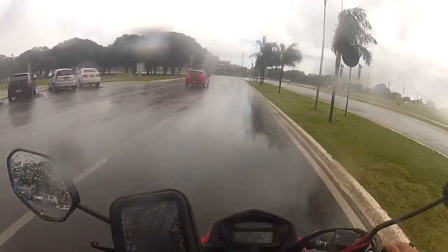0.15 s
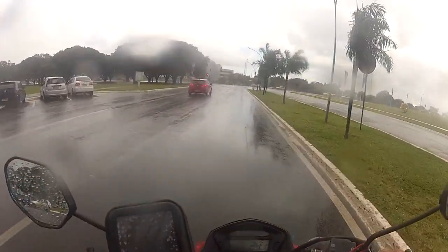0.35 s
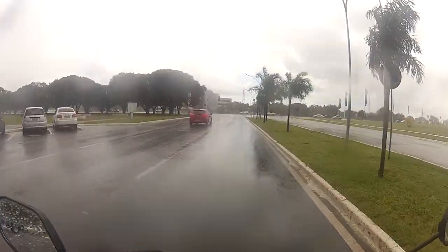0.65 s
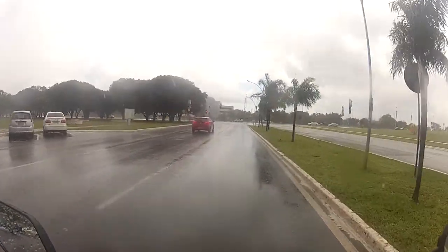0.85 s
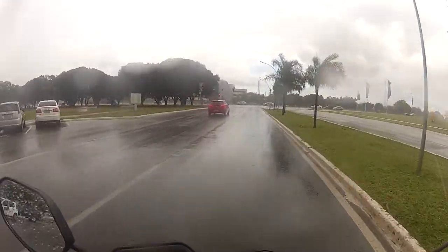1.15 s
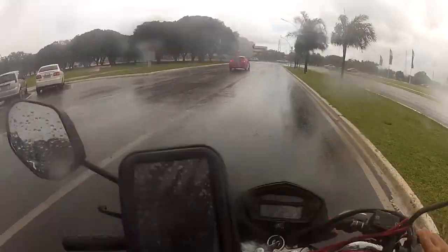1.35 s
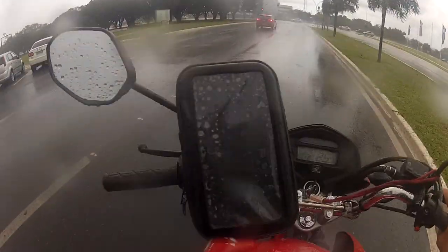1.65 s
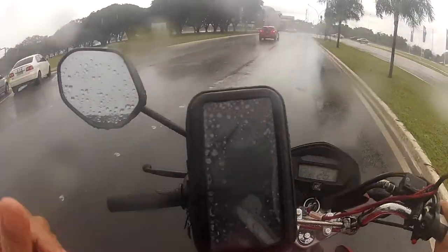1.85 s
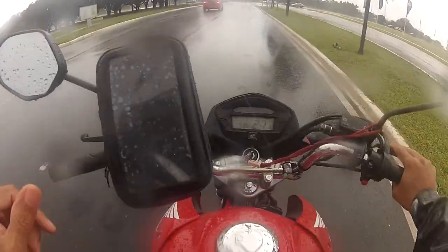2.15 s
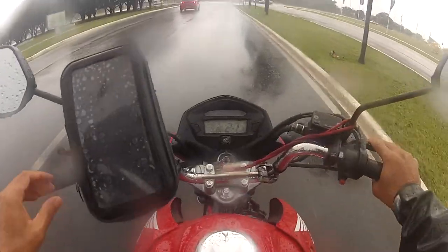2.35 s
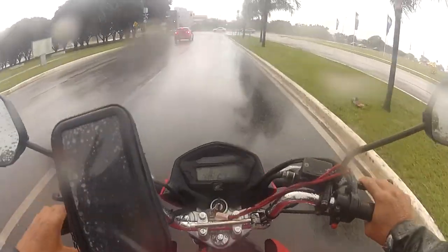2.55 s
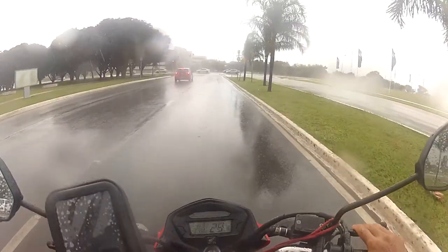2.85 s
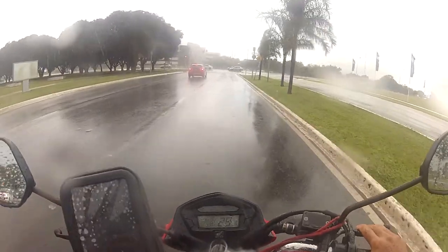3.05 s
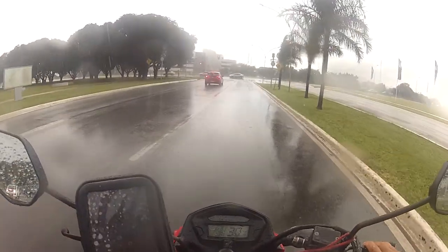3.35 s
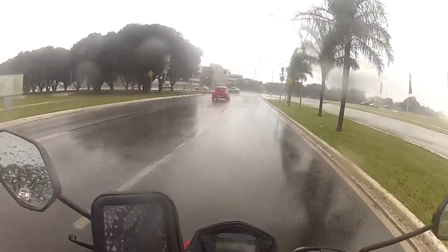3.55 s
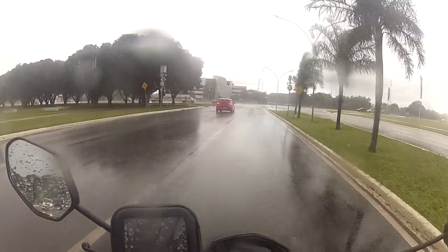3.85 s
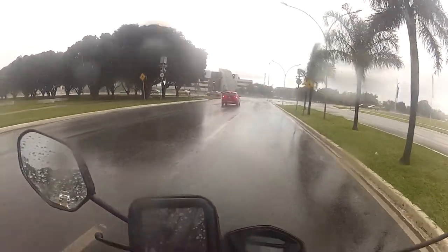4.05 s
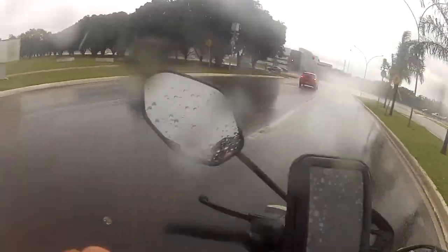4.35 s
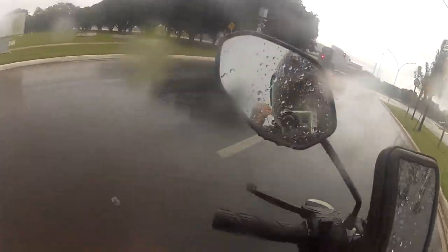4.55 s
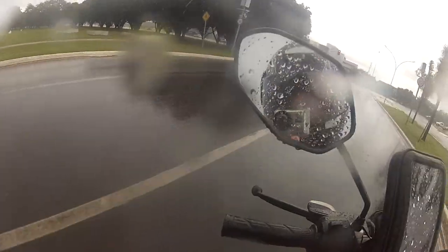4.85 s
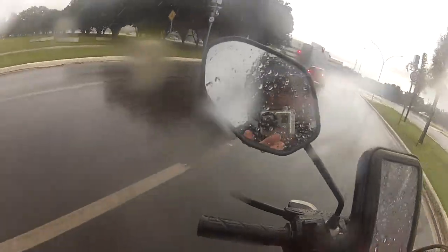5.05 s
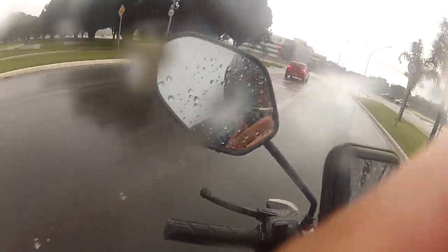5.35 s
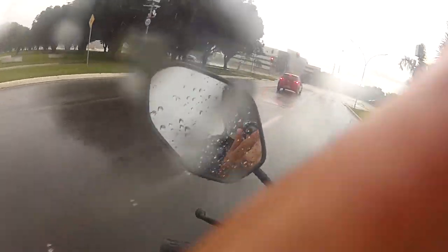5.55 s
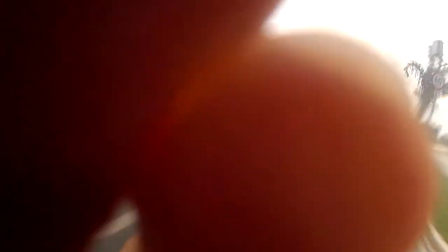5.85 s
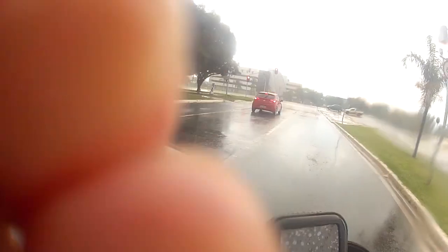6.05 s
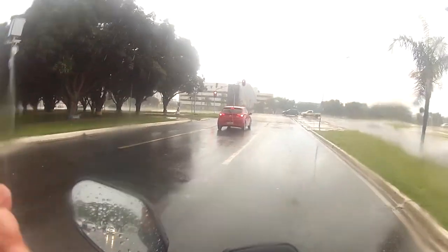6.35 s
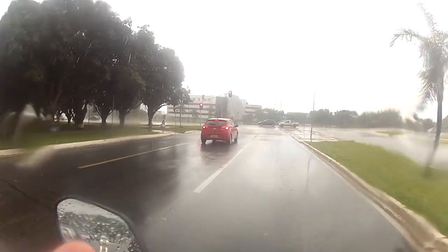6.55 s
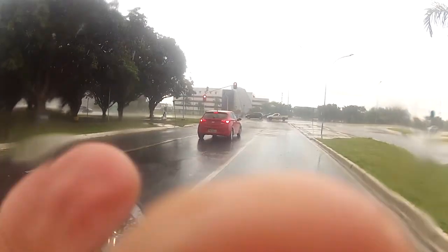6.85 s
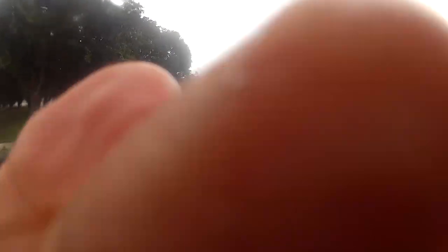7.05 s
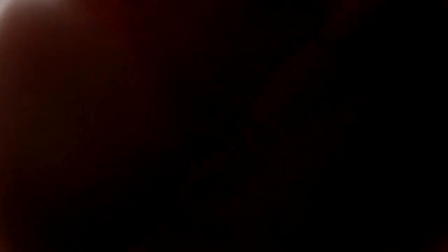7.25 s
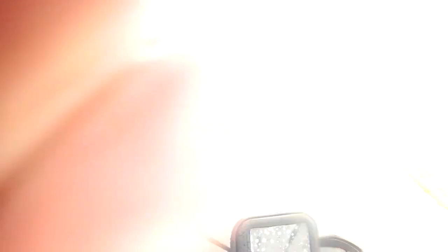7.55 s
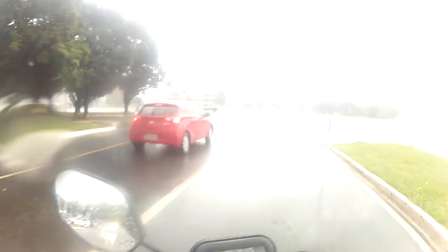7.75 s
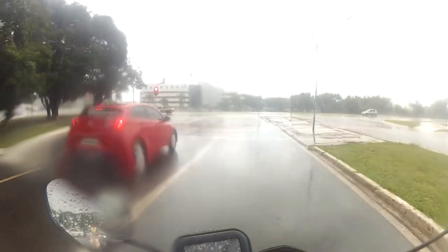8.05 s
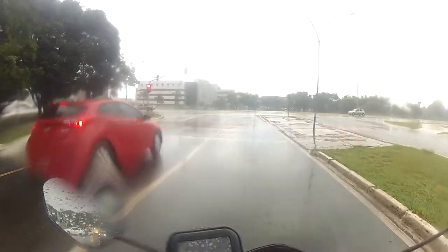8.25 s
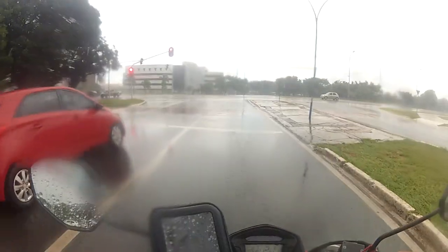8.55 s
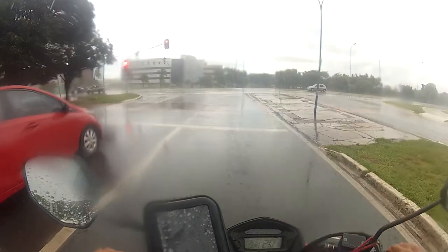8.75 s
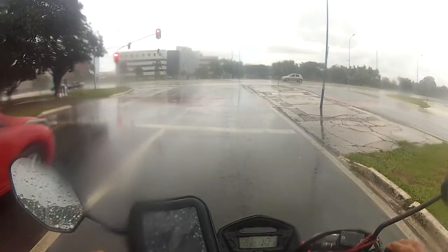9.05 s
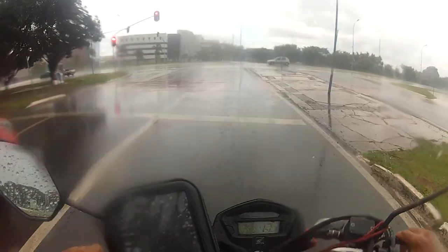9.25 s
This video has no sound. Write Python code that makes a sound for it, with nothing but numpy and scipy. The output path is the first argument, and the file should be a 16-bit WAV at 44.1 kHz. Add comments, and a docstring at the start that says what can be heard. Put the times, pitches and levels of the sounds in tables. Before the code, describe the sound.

Heard from inside a waterproof plastic case on a slowly rolling motorcycle: irregular sharp raindrop cracks, some with deep thuds, over faint wet-tyre hiss, low wind rumble and a barely audible engine. Around six seconds a wet finger rasps on the cover, judders again after seven, and a thin brake squeal comes near nine.

```python
"""Heavy rain taps on a waterproof plastic case with a camera inside, on a slowly rolling motorcycle.
Each drop is a crack of noise plus decaying sines, and the squarest hits add a low, damped sine thud.
Filtered noise makes patter, tyre wash, wind and gusts; the engine is a low tone with dull puffs.
Later a wet finger judders across the lens cover as stick-slip clicks and a filtered sawtooth.
Near the end a brake squeals as gliding sines; gain control and a slow converter colour it all."""
import sys
import numpy as np
from scipy import signal
from scipy.fft import rfft, irfft, next_fast_len
from scipy.io import wavfile
from scipy.ndimage import uniform_filter1d

SR = 44100
rng = np.random.default_rng(int(sys.argv[2]) if len(sys.argv) > 2 else 0)


def pcm_store(signal):
    """Save signal as 16-bit PCM."""
    levels = np.round(np.clip(np.atleast_2d(signal), -1, 1) * 32767)
    wavfile.write(sys.argv[1], SR, levels.astype(np.int16).T)


N = 414099

# tyre wash and fine rain heard through the case: (frequency [Hz], relative density [dB per Hz])
WASH_SPECTRUM = [(300, -0.5), (500, -11), (850, -14.5), (1150, 0.5), (1500, -2.5), (1850, 7.5),
                 (2080, -3.5), (2350, 6.5), (2700, 0), (3300, -7), (3750, 2), (4200, -13.5), (5700, -8.5)]
# narrow resonances in the wash: (frequency [Hz], width [Hz], relative level [dB])
WASH_RESONANCES = [(646, 23, -19), (987, 72, -17.5), (1296, 170, -5)]
# swell of tyre wash and fine rain: (time [s], level before layer trims [dB])
WASH_LEVEL = [(0, -42), (0.9, -44.5), (2.0, -44.5), (3.6, -41), (4.4, -44.5), (5.2, -41), (6.45, -46),
              (7.3, -46), (8.45, -50.5), (8.85, -46), (9.39, -47.5)]
# rumble of wind on the case: (frequency [Hz], relative density [dB per Hz])
WIND_SPECTRUM = [(20, 13.5), (55, 3), (85, 8), (115, 3), (160, 6), (210, 1), (260, 1), (330, -17),
                 (450, -17), (900, -31)]
# swell of the wind: (time [s], level before trim [dB])
WIND_LEVEL = [(0, -36.5), (0.7, -50.5), (1.1, -51), (1.6, -53.5), (3.0, -56.5), (4.0, -47.5), (4.4, -53.5),
              (5.2, -49), (5.55, -53), (6.0, -46), (6.45, -59), (7.3, -41.5), (7.8, -53), (8.2, -56.5),
              (9.39, -60.5)]
# engine beat: (time [s], mean firings per second [Hz], level before trim [dB])
ENGINE_CURVE = [(0, 29, -46), (1.5, 22.8, -61), (3, 23.6, -43.5), (5.5, 21, -40.5), (7.5, 23, -59),
                (9.39, 19.6, -51)]
# gusts and bumps of the case: (time [s], level [dB], centre frequency [Hz])
CASE_BUFFETS = [(0.001, -22.5, 89.6), (.162, -30.5, 149), (0.27, -31, 161.5), (.335, -27, 122),
                (.38, -18, 105.5), (.49, -33.5, 94.3), (0.809, -25.5, 145.7), (0.865, -24, 168.3),
                (0.916, -33.5, 116.2), (1.076, -32.5, 85), (1.24, -36, 26.56), (3.368, -38.5, 63.1),
                (3.761, -40, 34.6), (3.94, -35.5, 120.3), (4.465, -41, 62.1), (4.872, -20.5, 90),
                (5.74, -18, 50), (5.794, -24.5, 217), (6.3, -44.5, 52.8), (6.72, -23, 54.73),
                (6.78, -35, 39.85), (8.96, -46.5, 189.5)]
# loudest drops on the case: (time [s], tap level [dB], wall knock level before trim [dB])
CASE_DROPS = [(0.0312, -19.5, -42), (0.194, -28.5, -51), (0.301, -16.5, -37), (0.3733, -7, -5),
              (0.5695, -34.5, -54.5), (0.652, -19.5, -35), (0.713, -34.5, -45), (0.7715, -23, -31.5),
              (0.801, -22, -17), (0.8393, -15.5, -33), (0.9891, -25, -49), (1.1323, -26.5, -60),
              (1.3612, -7.5, -17), (1.4067, -23, -46), (1.4423, -29.5, -53), (1.659, -35, -61),
              (1.6993, -29, -54), (1.7521, -23, -40), (1.7687, -27.5, -46), (2.317, -31.5, -37),
              (2.3311, -30.5, -54), (2.7833, -36.5, -71), (2.8722, -24.5, -37.5), (2.8814, -22, -65),
              (2.9315, -36, -64), (3.1214, -34.5, -51), (3.228, -25, -35), (3.2316, -16, -23),
              (3.3137, -26.5, -50), (3.5399, -22.5, -27.5), (3.6569, -32.5, -40.5), (3.8065, -26.5, -55),
              (3.8118, -24, -58), (3.8879, -25, -66), (3.9456, -30, -34), (4.0764, -32.5, -47),
              (4.208, -28, -56), (4.213, -21.5, -30), (4.3249, -26, -66), (4.4973, -32.5, -67),
              (4.7017, -33, -64), (4.7665, -26, -42), (4.8015, -31.5, -50), (4.834, -32, -63),
              (4.87, -12.5, -11), (4.9074, -31, -45), (5.0292, -34, -57), (5.1032, -23, -45),
              (5.228, -29.5, -45), (5.239, -23.5, -51), (5.319, -34, -46), (5.5447, -34, -62),
              (5.6963, -22.5, -58), (5.715, -21, -62), (5.7631, -24.5, -25.5), (5.8597, -18.5, -45),
              (5.9961, -27, -37.5), (6.042, -27.5, -35), (6.165, -24.5, -34), (6.1766, -13.5, -30),
              (6.431, -31, -61), (6.531, -31.5, -38.5), (6.65, -16, -35), (7.131, -26.5, -36.5),
              (7.5723, -29, -38.5), (7.6152, -30, -42), (8.009, -30.5, -46.5), (8.142, -21, -56),
              (8.341, -33.5, -58), (8.9435, -21, -45.5), (9.1384, -18.5, -32), (9.183, -32, -57)]
# ringing of the case: (frequency [Hz], relative level [dB], 60 dB decay time [s])
CASE_MODES = [(970, -40, 0.061), (1268.5, 6.5, 0.029), (1616, -30, 0.11), (2050, 4.5, 0.011),
              (2328, -4.5, 0.026), (2570, 4, 0.014), (2710, -8.5, 0.027), (2870, -1.5, 0.011),
              (3490, -3.5, 0.015), (3690, 0.5, .016), (4460, -6, 0.0091), (4600, -35, 0.03),
              (5290, -17.5, 0.016)]
# bending of the wall under a heavy drop: (frequency [Hz], relative level [dB], 60 dB decay time [s])
WALL_MODES = [(561, -4, 0.025), (757, 8, 0.0092), (1004, -1, 0.042)]
# squeezed air inside the case: (frequency [Hz], relative level [dB], 60 dB decay time [s])
AIR_MODES = [(123, -12, 0.045), (200, 3.5, 0.0074), (309, -7, 0.022)]
# loudest soft splashes, as on a helmet or jacket: (time [s], level before layer trims [dB])
SOFT_SPLATS = [(0.871, -35.5), (1.179, -34), (2.09, -36), (2.217, -36.5), (2.483, -36.5), (3.042, -36),
               (3.276, -34), (3.516, -33.5), (3.777, -34), (5.171, -39), (5.421, -38), (6.457, -38),
               (6.566, -38), (6.779, -41), (6.983, -29), (7.075, -35.5), (7.584, -40), (8.105, -38.5),
               (8.195, -38.5), (8.273, -39.5)]
# low thuds of heavy drops that hit the case squarely, and one hand bump at 6.72 s:
# (time [s], level before damping [dB], frequency [Hz])
LOW_THUDS = [(0.3729, 7, 135), (0.801, -15, 200), (1.362, -6.5, 220), (4.8679, -3.5, 150),
             (5.7636, -8.5, 130), (6.722, -12.5, 50)]
# finger strokes: (time [s], hold [s], lift [s], mean slip rate pressing [Hz], mean slip rate lifting [Hz],
# flexing level [dB], rasp level at the start [dB])
FINGER_STROKES = [(6.05, 0.0088, 0.021, 384, 200, -15, -11.5), (6.075, 0.024, .07, 304, 660, -23, -15.5),
                  (6.965, 0.058, 0.024, 191, 135, -28, -35.5), (7.123, .072, .06, 114.3, 195, -12.5, -24),
                  (7.356, .018, .01, 310, 247, -24, -35), (7.379, .027, .012, 225, 160, -12.5, -13.5),
                  (7.424, .024, 0.024, 205, 165, -11, -16.5), (7.463, .006, 0.057, 170, 228, -16, -25),
                  (7.564, 0.019, .05, 170, 165, -30.5, -38)]
# lens cover under the finger: (frequency [Hz], width [Hz], relative level [dB])
COVER_RESONANCES = [(334, 37, 4.5), (420, 49, 0), (660, 110, -2), (980, 70, 4), (1255, 55, 7),
                    (1670, 440, -1.5), (2110, 470, -9.5), (2330, 96, 0.5), (2980, 290, -7.5),
                    (3705, 71, -9.5), (4840, 350, -22.5)]
# lower mode of the brake disc: (time [s], mean frequency [Hz], mean level of the sine's peak [dB])
LOW_SQUEAL = [(8.915, 3520, -58), (8.935, 3522, -31.5), (9.01, 3550, -24), (9.043, 3590, -33.5),
              (9.058, 3720, -20), (9.08, 3742, -13.5), (9.1, 3780, -26), (9.13, 3900, -34),
              (9.17, 3650, -45), (9.272, 3840, -58), (9.298, 3520, -29), (9.325, 3450, -70)]
# higher mode of the brake disc: (time [s], mean frequency [Hz], mean level of the sine's peak [dB])
HIGH_SQUEAL = [(9.12, 4800, -62), (9.155, 4750, -39), (9.25, 4730, -49), (9.29, 4870, -57)]

# a drop is heavy when its knock is no further than this below its tap; the excess dulls it
HEAVY_WITHIN_DB, HEAVY_DULLING_DB_PER_DB, LIGHT_BRIGHT_DB = 11.5, 0.71, 1.5
SPLAT_S = 0.01  # a splash peaks after a third of this
BUFFET_CYCLES = 2.9  # a buffet peaks after a third of this, so deep ones last longer
THUD_CYCLES = 0.67  # decay time constant
GRIP_S, FLEX_BUILD_CYCLES = 0.0015, 1.26
RASP_SAG_DB_PER_S, SLIP_GLIDE_SHARE = 83, 0.4  # share of the lift over which the slip rate glides
CONVERTER_HZ, CUTOFF_HZ = 12000, 15100


def from_db(db):
    """Decibels to gain."""
    return 10 ** (np.asarray(db) / 20)


def rms_one(x):
    """Scale to rms 1."""
    return x / np.sqrt(np.mean(x ** 2) + 1e-20)


def in_time(rows):
    """Draw each column of a curve at every sample."""
    s, *columns = np.transpose(rows)
    return [np.interp(np.arange(N) / SR, s, column) for column in columns]


def during(rows, fade=0.0027):
    """Open a gate while a curve lasts, with short fades outside it."""
    start, end = rows[0][0], rows[-1][0]
    return np.interp(np.arange(N) / SR, [start - fade, start, end, end + fade], [0, 1, 1, 0])


def add(out, s, sound):
    """Mix a short sound in at time s."""
    i = int(np.clip(round(s * SR), 0, N - 1))
    out[i:i + len(sound)] += sound[:N - i]


def cut(x, hz, kind, order=2):
    """Butterworth filter."""
    sections = signal.butter(order, hz, kind, fs=SR, output="sos")
    return signal.sosfilt(sections, x + 1e-18)


def drift(rate):
    """Smooth random wander of spread 1, with rate new targets per second."""
    knots = rng.standard_normal(int(N / SR * rate) + 2)
    wander = np.interp(np.arange(N) / SR * rate, np.arange(len(knots)), knots)
    return wander / np.sqrt(2 / 3)  # interpolation narrows the spread


def coloured(spectrum):
    """Noise shaped to a spectrum, at rms 1."""
    hz, db = np.transpose(spectrum)
    size = next_fast_len(N)
    bins = np.maximum(np.fft.rfftfreq(size, 1 / SR), 1)
    gain = from_db(np.interp(np.log(bins), np.log(hz), db, left=-60, right=-60))
    return rms_one(irfft(rfft(rng.standard_normal(size)) * gain, size)[:N])


def resonate(x, hz, width):
    """Two-pole resonance with gain 1 on top."""
    r = np.exp(-np.pi * width / SR)
    feed = np.array([1, 0, -1]) * (1 - r * r) / 2
    return signal.lfilter(feed, [1, -2 * r * np.cos(2 * np.pi * hz / SR), r * r], x + 1e-18)


def struck(modes, tilt_db, scatter_db, detune):
    """Decaying sines with random strengths, signs and detuning per impact; tilt is per octave."""
    hz, db, t60 = np.transpose(modes)[:, :, None]
    t = np.arange(int(0.06 * SR)) / SR
    strength, sign, shift = rng.standard_normal((3, len(modes), 1))
    gain = np.sign(sign) * from_db(db + tilt_db * np.log2(hz / hz[0]) + scatter_db * strength)
    decay = from_db(-60 * t / t60)
    return np.sum(gain * decay * np.sin(2 * np.pi * hz * (1 + detune * shift) * t), axis=0)


def at_level(sound, db):
    """Set the rms of the first 10 ms."""
    return sound * from_db(db) / np.sqrt(np.mean(sound[:SR // 100] ** 2) + 1e-20)


def shower(wash_db, per_s, least_db, range_db):
    """Random impacts (time [s], level [dB]), one per time slot; most are small, and all follow the wash."""
    slots = np.arange(0, N / SR, 1 / per_s)
    place, size = rng.random((400, 2))[:len(slots)].T
    s = np.minimum(slots + place / per_s, (N - 1) / SR)
    levels = wash_db[(s * SR).astype(int)] + least_db + range_db * size ** 2
    return list(zip(s, levels))


def wash(wash_db, steady_db=-7, patter_db=-8, per_s=30, splash_s=0.0032):
    """Tyres hiss on the water while rain splashes on helmet and tank; both come through the case."""
    hiss = coloured(WASH_SPECTRUM)
    for hz, width, db in WASH_RESONANCES:
        hiss = hiss + from_db(db) * rms_one(resonate(rng.standard_normal(N), hz, width))
    sizes = from_db(0.66 * np.clip(rng.standard_normal(N), -2, 2))
    splashes = (rng.random(N) < per_s / SR) * sizes
    r = np.exp(-1 / (splash_s * SR))
    swell = signal.lfilter([1], [1, -2 * r, r * r], splashes + 1e-18)  # rounded rise and fall
    patter = rms_one(swell * cut(coloured(WASH_SPECTRUM), [1050, 3100], "band"))
    return from_db(wash_db) * (from_db(steady_db) * rms_one(hiss) + from_db(patter_db) * patter)


def wind(wind_db, level_db=2.0, lumpy_db=4.0):
    """The air stream rumbles on the case: low noise with a lumpy, wandering level."""
    return from_db(wind_db + level_db + lumpy_db * drift(22)) * coloured(WIND_SPECTRUM)


def engine(level_db=-4.0, muffle_hz=260, uneven_db=2):
    """One cylinder: a low sine at the firing rate, with a quieter dull puff at every firing."""
    rate, db = in_time(ENGINE_CURVE)
    turns = np.cumsum(rate * (1 + 0.00903 * drift(6.3))) / SR
    puffs = np.diff(np.floor(turns), prepend=0) * from_db(uneven_db * drift(25))
    muffled = cut(puffs, muffle_hz, "low", order=4)
    exhaust = rms_one(cut(muffled, 41, "high"))
    return from_db(db + level_db) * (np.sin(2 * np.pi * turns) + from_db(-11.5) * exhaust)


def buffets(spread=1.63):
    """Gusts and bumps on the case: bursts of low band noise that swell quickly and die away."""
    out = np.zeros(N)
    for s, db, hz in CASE_BUFFETS:
        length = BUFFET_CYCLES / hz
        age = np.arange(int(4 * length * SR)) / (length * SR)
        band = [hz / max(spread, 1.1), hz * max(spread, 1.1)]
        eddies = cut(rng.standard_normal(2 * SR), band, "band")[-len(age):]  # filter has settled
        burst = eddies * age * np.exp(-3 * age)
        add(out, s, from_db(db) * burst / np.sqrt(np.sum(burst ** 2) / (length * SR)))
    return out


def drops(tilt_db=3.0, crack_t60=0.0062, crack_hz=2500, knock_db=-2, air_db=-12, rebound=0.37):
    """A drop cracks as it bursts and rings case, wall and inner air; heavy ones sound duller."""
    out, t = np.zeros(N), np.arange(int(0.06 * SR)) / SR
    for s, tap, knock in CASE_DROPS:
        heaviness = max(knock - tap + HEAVY_WITHIN_DB, 0)
        bright = LIGHT_BRIGHT_DB - HEAVY_DULLING_DB_PER_DB * heaviness
        ring = struck(CASE_MODES, tilt_db + 0.8 * bright, scatter_db=3.5, detune=0.006)
        centre = np.clip(crack_hz * from_db(bright / 2), 1000, 4200)  # small, fast drops burst higher
        burst = rng.standard_normal(len(t)) * from_db(-60 * t / crack_t60)
        crack = cut(burst, [centre * 0.66, centre * 1.228], "band")
        tick = cut(rms_one(ring) + rms_one(crack), 900, "high", order=3)
        # the flattened drop slaps again
        delay = rng.uniform(0.000683, 0.003)
        tick = tick + rebound * np.interp(t - delay, t, tick, left=0)
        wall = cut(struck(WALL_MODES, 0, scatter_db=2.5, detune=0.005), 560, "high", order=3)
        air = cut(struck(AIR_MODES, 0, scatter_db=2.5, detune=0.08), [50, 450], "band")
        add(out, s, at_level(tick, tap))
        add(out, s, at_level(wall, knock + knock_db) + at_level(air, knock + air_db))
    return out


def fine_drops(wash_db, per_s=11, least_db=-3, range_db=12):
    """Droplets tick on the case at random, ringing its modes around and above the level of the wash."""
    out = np.zeros(N)
    for s, db in shower(wash_db, per_s, least_db, range_db):
        ring = struck(CASE_MODES, rng.normal(4, 5), scatter_db=4, detune=0.01)
        add(out, s, at_level(cut(ring, 950, "high", order=3), db))
    return out


def splats(wash_db, splash_db=2, thump_db=-9, per_s=4, least_db=-1, range_db=6):
    """Water bursts on something soft: a rounded, dull noise splash over a small thump; more fall at random."""
    splash, thump = np.zeros((2, N))
    age = np.arange(SR // 8) / (SPLAT_S * SR)
    for s, db in list(SOFT_SPLATS) + shower(wash_db, per_s, least_db, range_db):
        add(splash, s, from_db(db + splash_db) * 3 * age * np.exp(1 - 3 * age))
        add(thump, s, from_db(db + thump_db) * 2 * age * np.exp(1 - 2 * age))
    spray = splash * rms_one(cut(coloured(WASH_SPECTRUM), [1100, 2600], "band"))
    push = splash * rms_one(cut(rng.standard_normal(N), [700, 1500], "band", order=1))
    # the case hums briefly after each
    ringing = sum(resonate(push, hz, width) for hz, width, db in WASH_RESONANCES)
    body = thump * rms_one(cut(rng.standard_normal(N), [110, 280], "band", order=3))
    return spray + ringing + body


def thuds():
    """Heavy drops hit the case squarely, and a hand bumps it once: heavily damped low sines."""
    out, t = np.zeros(N), np.arange(SR // 8) / SR
    for s, db, hz in LOW_THUDS:
        add(out, s, from_db(db) * np.sin(2 * np.pi * hz * t) * np.exp(-hz * t / THUD_CYCLES))
    return out


def stroking(flex_fade=0.83, rasp_fade=0.77):
    """The finger grips, flexing builds while rasp sags, and the slip rate glides as it lifts."""
    t = np.arange(N) / SR
    rate, flex, rasp = np.full(N, 200.0), np.zeros(N), np.zeros(N)
    for s, hold, lift, pressed_hz, lifted_hz, flex_db, rasp_db in FINGER_STROKES:
        age = np.arange(int((hold + lift) * SR)) / SR
        pressure = np.minimum(age / GRIP_S, 1) * np.interp(age, [hold, hold + lift], [1, 0])
        build = 1 - np.exp(-age * pressed_hz / FLEX_BUILD_CYCLES)
        add(flex, s, from_db(flex_db) * build * pressure ** flex_fade)
        sagging_db = rasp_db - RASP_SAG_DB_PER_S * np.minimum(age, hold)
        add(rasp, s, from_db(sagging_db) * pressure ** rasp_fade)
        glide = np.interp(t - s - hold, [0, SLIP_GLIDE_SHARE * lift], [pressed_hz, lifted_hz])
        rate = np.where(t < s, rate, glide)
    return rate, flex, rasp


def finger(jitter=0.075, uneven_db=2.2, flex_hz=170, grit_db=-12, catch=0.55, damping_db=3):
    """Wet skin sticks and slips: the cover flexes in a sawtooth and slips click in its resonances."""
    rate, flex, rasp = stroking()
    turns = np.cumsum(rate * (1 + jitter * drift(250))) / SR
    slips = np.diff(np.floor(turns), prepend=0) * from_db(uneven_db * drift(300))
    # in slow judder the skin also catches again abruptly, about half-way through the cycle
    catches = np.diff(np.floor(turns + 0.45), prepend=0) * (rate < 150)
    grit = rng.standard_normal(N) * np.exp(-3 * (turns % 1))
    force = rms_one(slips - catch * catches) + from_db(grit_db) * rms_one(grit)
    clicks = np.zeros(N)
    for k, (hz, width, db) in enumerate(COVER_RESONANCES):
        # the moving fingertip damps now one resonance, now another
        gain = (-1) ** k * from_db(db + damping_db * drift(35))
        clicks += gain * resonate(force, hz, width)
    sawtooth = cut(0.5 - turns % 1, flex_hz, "low", order=1)
    bending = cut(cut(sawtooth, 70, "high"), 520, "low")
    # even out both signals so that the strokes alone set their levels
    clicks, bending = [v / np.sqrt(uniform_filter1d(v * v, size=600) + 1e-12) for v in (clicks, bending)]
    return flex * bending + rasp * clicks


def squeal(curve, waver=0.00145, flutter_db=4.0):
    """The wet pad makes one mode of the disc sing: a gliding sine with unsteady pitch and level."""
    hz, db = in_time(curve)
    turns = np.cumsum(hz * (1 + waver * drift(200))) / SR
    return during(curve) * from_db(db + flutter_db * drift(120)) * np.sin(2 * np.pi * turns)


def scene():
    """Rain, bike, wind and handling, as they reach the microphone inside the case."""
    wash_db, = in_time(WASH_LEVEL)
    wind_db, = in_time(WIND_LEVEL)
    rain = wash(wash_db) + drops() + fine_drops(wash_db) + splats(wash_db)
    bike = engine() + squeal(LOW_SQUEAL) + squeal(HIGH_SQUEAL)
    return (rain + bike + wind(wind_db) + buffets() + thuds() + finger())[None]


def gain_control(x, threshold_db=-4, release_db_per_s=90, attack_s=0.0092):
    """A loud peak pulls the gain down; the detected level then falls steadily and the gain recovers."""
    fall = release_db_per_s * np.arange(N) / SR
    peak_db = 20 * np.log10(np.abs(x) + 1e-9)
    level = np.maximum.accumulate(peak_db + fall, axis=1) - fall
    r = np.exp(-1 / (attack_s * SR))
    reduction_db = signal.lfilter([1 - r], [1, -r], np.maximum(level - threshold_db, 0))
    return x * from_db(-reduction_db)


def record(dry):
    """A slow converter overloads on loud taps and holds each sample, mirroring sound into the treble."""
    slow = signal.resample_poly(gain_control(dry), CONVERTER_HZ, SR, axis=1, window=("kaiser", 3))
    clipped = slow / (1 + (slow / 0.7) ** 6) ** (1 / 6)  # soft ceiling at 0.7
    steps = np.repeat(clipped, 4, axis=1)
    held = signal.resample_poly(steps, SR, 4 * CONVERTER_HZ, axis=1)[:, :N]
    lowpass = signal.ellip(8, 0.5, 70, CUTOFF_HZ, fs=SR, output="sos")
    return signal.sosfilt(lowpass, held)


dry = scene()
out = record(dry)
pcm_store(out)
```